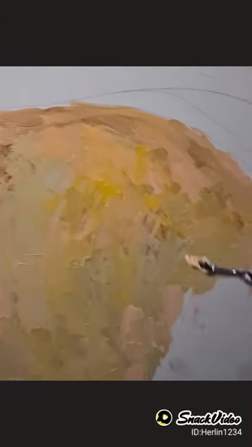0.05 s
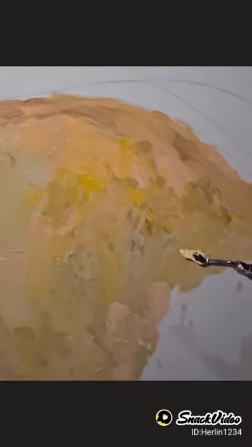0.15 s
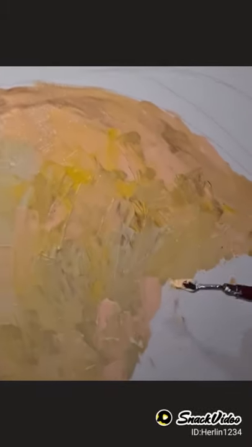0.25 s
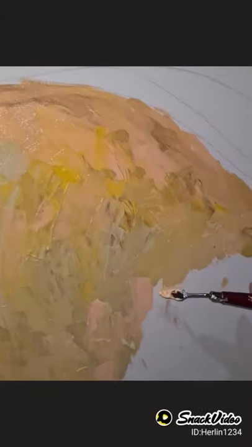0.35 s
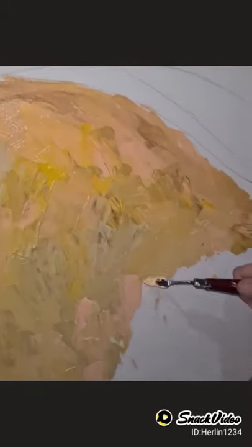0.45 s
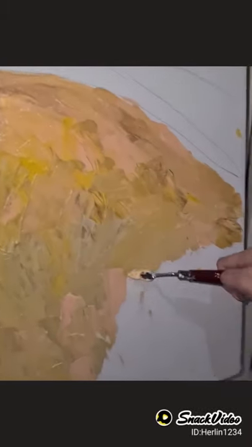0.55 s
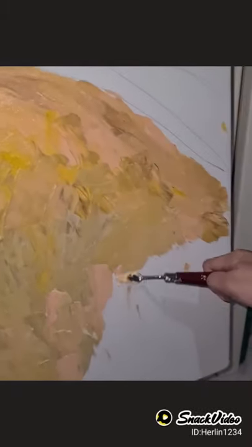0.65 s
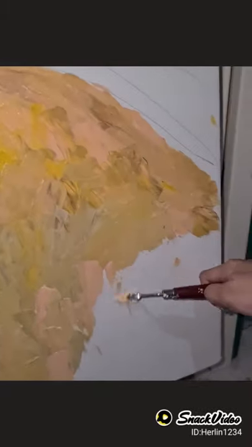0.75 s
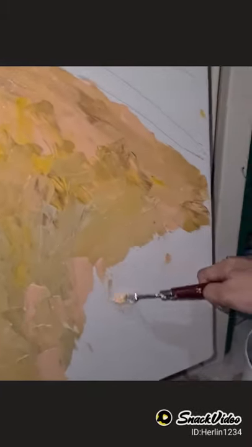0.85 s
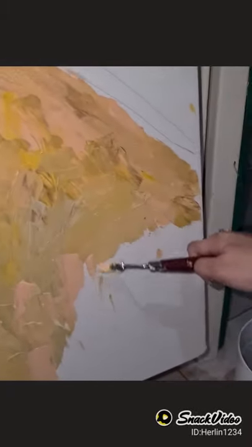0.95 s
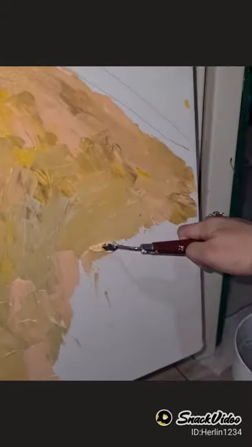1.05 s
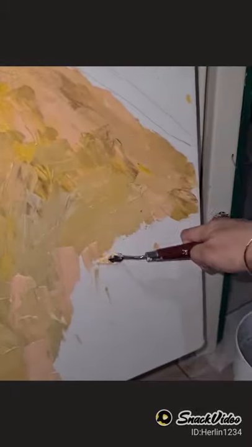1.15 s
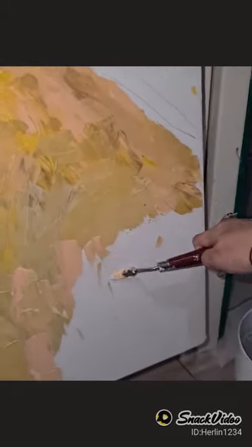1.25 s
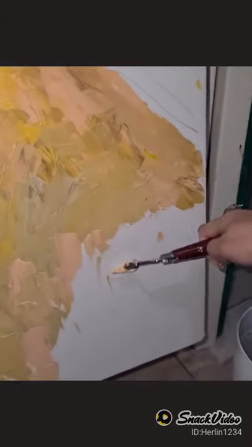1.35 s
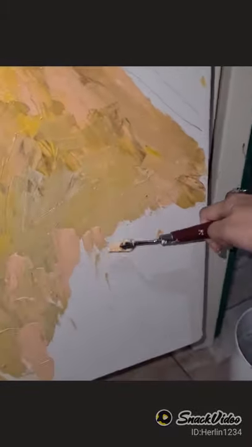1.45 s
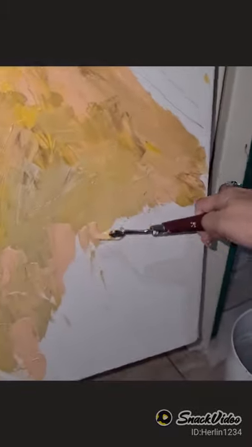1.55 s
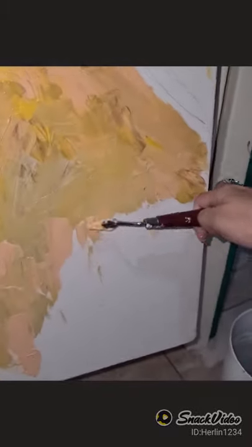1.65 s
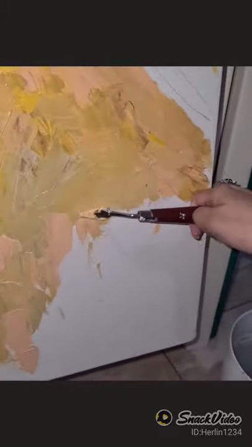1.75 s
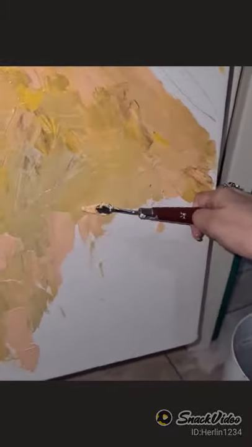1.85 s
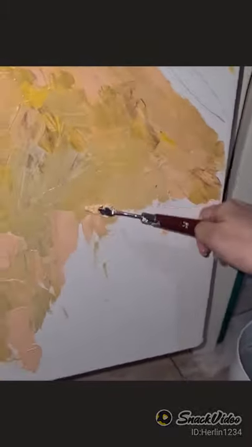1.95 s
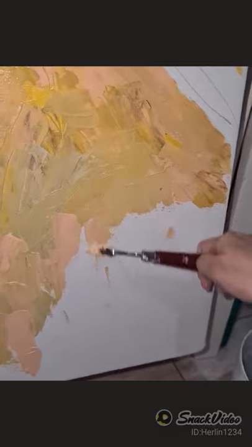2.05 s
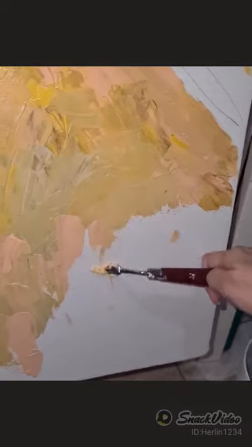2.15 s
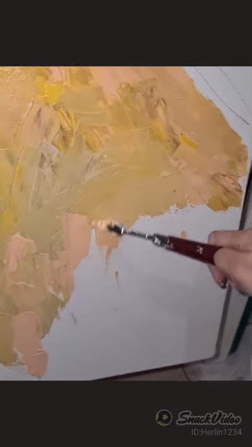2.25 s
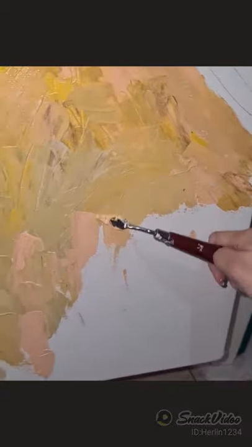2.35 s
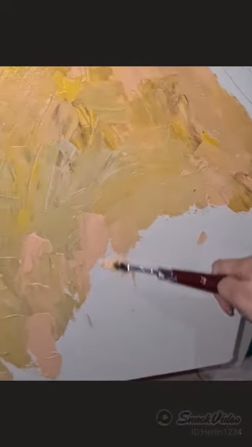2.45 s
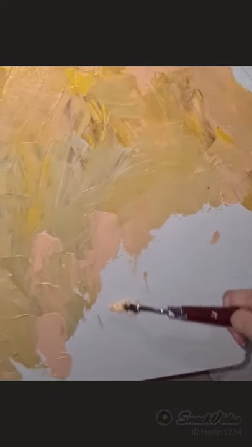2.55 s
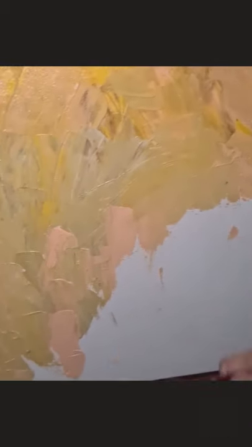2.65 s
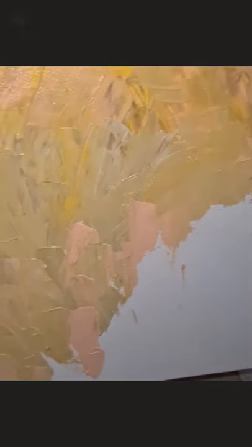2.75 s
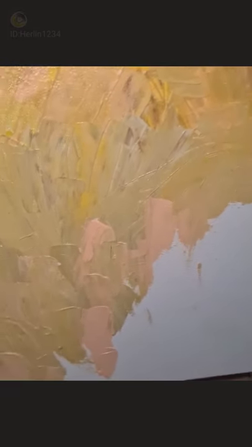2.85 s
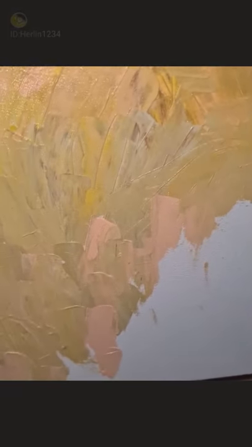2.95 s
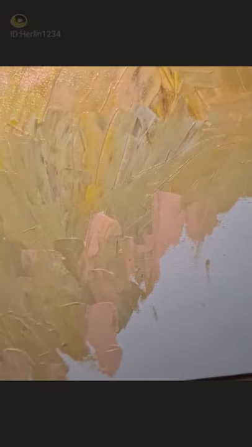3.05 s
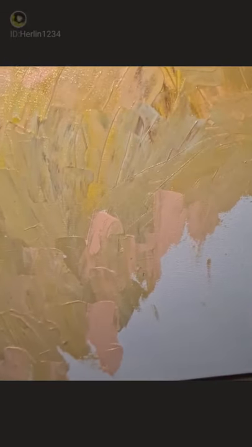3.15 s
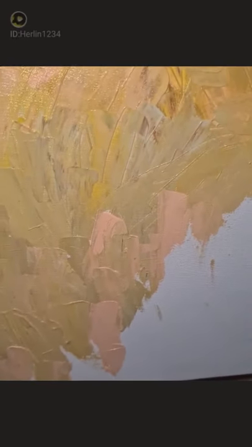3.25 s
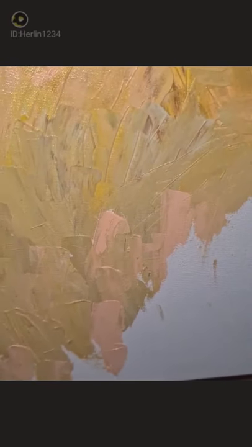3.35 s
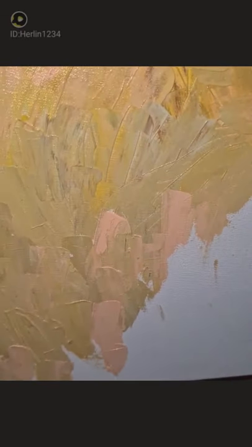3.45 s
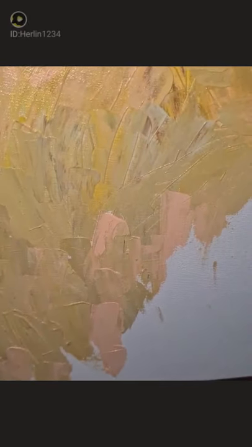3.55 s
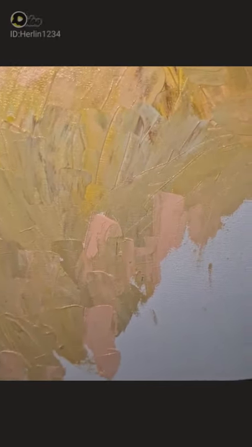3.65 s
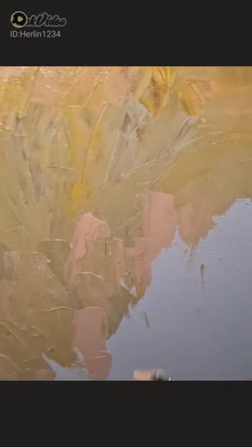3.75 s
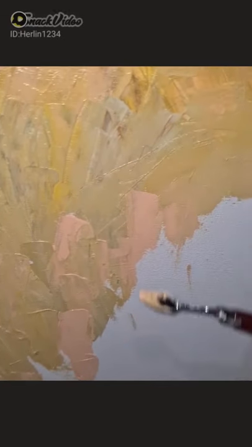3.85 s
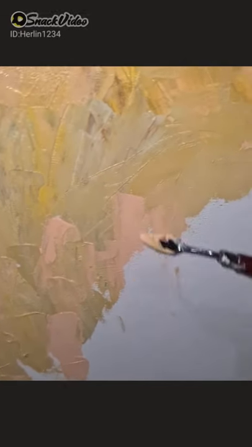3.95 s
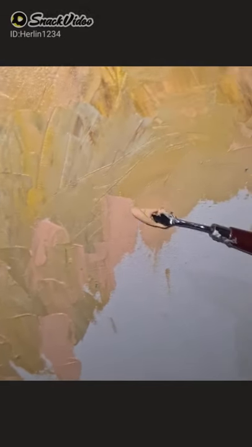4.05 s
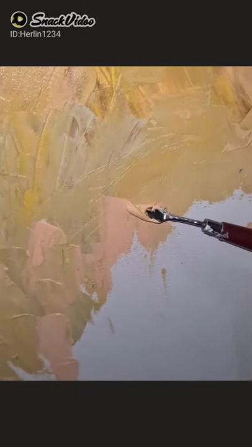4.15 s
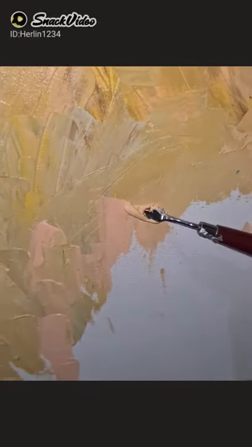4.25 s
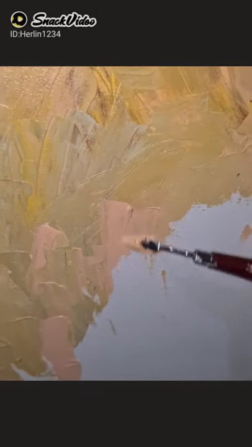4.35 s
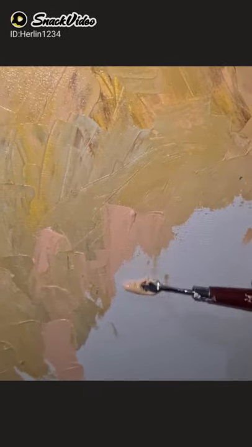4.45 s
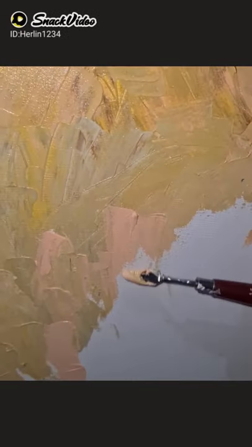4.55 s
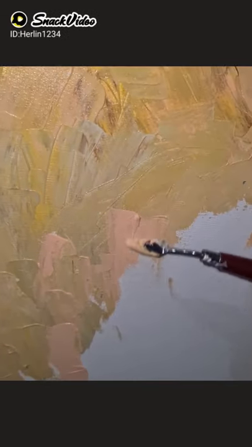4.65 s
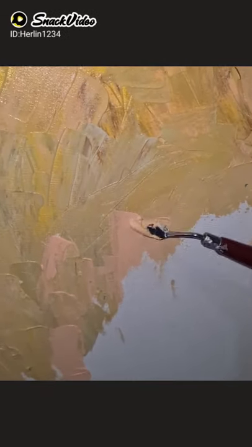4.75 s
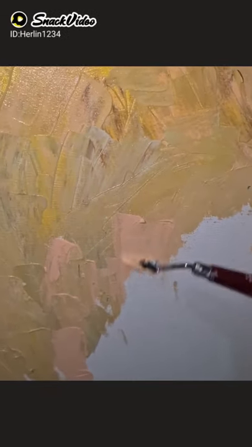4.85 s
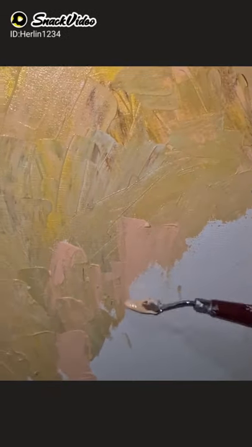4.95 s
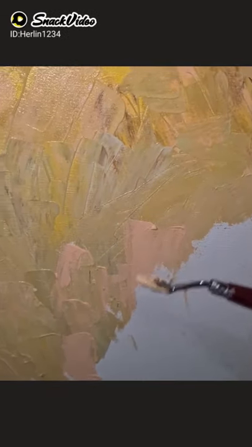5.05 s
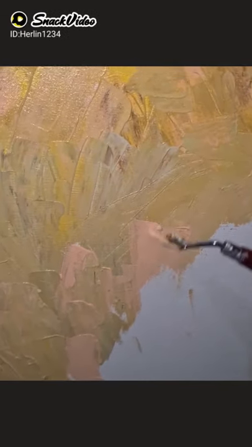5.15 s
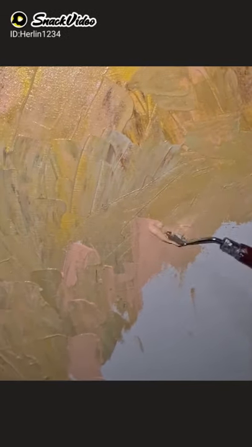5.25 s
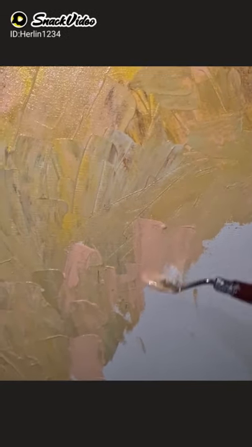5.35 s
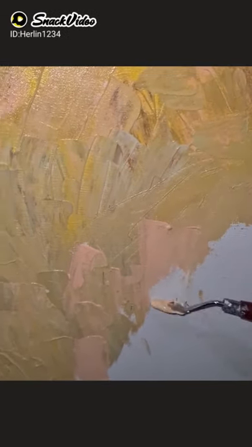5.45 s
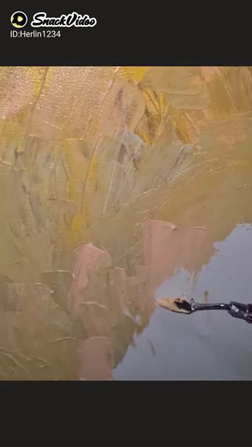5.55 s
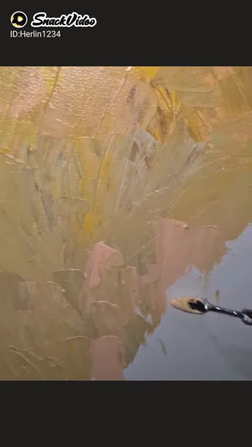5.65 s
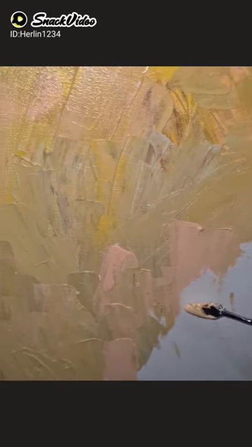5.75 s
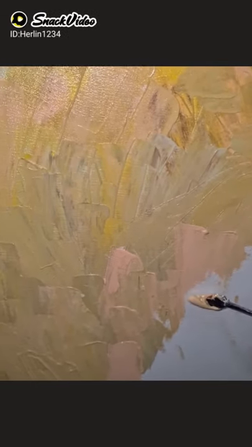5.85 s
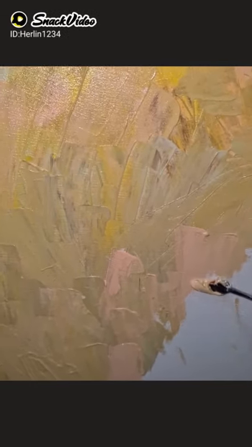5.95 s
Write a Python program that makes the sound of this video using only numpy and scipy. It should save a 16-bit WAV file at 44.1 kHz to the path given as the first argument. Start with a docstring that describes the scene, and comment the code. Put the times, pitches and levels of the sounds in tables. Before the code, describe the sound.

A palette knife rubs thick paint on stretched canvas in brief hollow, raspy strokes, sparse small groups over quiet room air and a low hum.

```python
"""Quiet room air and a wavering low hum, then dull dry ticks, a faint rustle and the first tap of a palette knife.
The knife spreads thick paint on a stretched canvas in short strokes, in a small room.
Random slips of the blade on the weave ring the canvas modes as a drumming; grainy noise and blade modes
make the steel rasp, with a finer hiss above. Taps thud in the canvas, click in the steel and thump the frame.
Air is banded noise, hum is sines; short echoes and feedback delays make the surroundings."""
import sys
import numpy as np
from scipy import signal
from scipy.io import wavfile
from scipy.ndimage import uniform_filter1d

SR = 44100
rng = np.random.default_rng(int(sys.argv[2]) if len(sys.argv) > 2 else 0)


def store_wav(level_fs):
    """Save 16-bit WAV to argv[1]."""
    pcm = np.round(np.clip(np.atleast_2d(level_fs), -1, 1) * 32767)
    wavfile.write(sys.argv[1], SR, pcm.T.astype(np.int16))


N = 264600
TIME = np.arange(N) / SR

# Spectral tables give noise density, so their level/dB is per Hz and only relative.
# Left-right columns are positive towards the left.
# room air: f/Hz, level/dB
AIR_SPECTRUM = [(25, -20), (45, 2.5), (65, 0), (95, -10.5), (125, 1), (200, -20.5), (400, -11), (620, -16),
                (850, -16.5), (1600, -20.5), (2600, -27), (4000, -38), (6500, -46), (15500, -48.5)]
# left-right likeness of the air: f/Hz, likeness (1 = same on both sides)
AIR_LIKENESS = [(60, 1), (250, 0.59), (1000, 0.067), (4000, 0.033), (12000, .1)]
# steady hum tones: f/Hz, rms level/dB
HUM_TONES = [(165, -64), (247.5, -76.5)]
# swells of the deep hum: middle t/s, half width t/s, rise level/dB
DEEP_SWELLS = [(2.42, 0.058, 16.5), (4.9, 0.88, 8.2)]
# faint dry ticks: t/s, relative level/dB
DRY_TICKS = [(0.081, -28), (0.212, -27), (0.2335, -30.5), (0.261, -29), (0.3055, -33), (0.321, -33),
             (0.327, -30), (0.3675, -30.5), (5.671, -35)]
# small dry clicks: t/s, relative level/dB
SMALL_CLICKS = [(3.461, -41.5), (3.533, -45), (3.593, -55), (3.649, -52.5)]
# tones the small clicks leave: f/Hz, level/dB, t60 t/s
CLICK_MODES = [(1200, -16.5, 0.19), (1252, 5, 0.029), (1980, -7.5, 0.026), (2740, -24, .018)]
# faint rustles: middle t/s, half width t/s, level/dB
RUSTLES = [(.345, 0.068, -63.5), (3.34, 0.067, -71)]
# colour of the rustles: f/Hz, level/dB
RUSTLE_SPECTRUM = [(2200, 4), (3200, 12), (5000, -2), (7000, -19), (11000, -12)]
# left-right likeness of rustle and scrape: f/Hz, likeness
SCRAPE_LIKENESS = [(800, 0.75), (2000, 0.49), (4000, 0.03), (9000, 0.02)]
# blade lands or snags: t/s, then relative level/dB of canvas thud, steel click, frame thump
TAPS = [(0.497, -36.5, -75, -60), (0.686, -40, -33.5, -80), (0.8113, -25, -15.5, -82),
        (0.8195, -31, -21.5, -82), (1.125, -59, -62, -49), (1.385, -40, -70, -51), (2.3235, -31, -35, -55),
        (2.389, -37, -38, -72), (2.4865, -31, -41, -71), (4.079, -28, -49, -42), (4.086, -40, -58, -40.5),
        (4.763, -40, -65, -56), (4.833, -27, -49, -80), (5.204, -27.5, -60, -58), (5.291, -31, -32, -70),
        (5.313, -26.5, -30, -78), (5.358, -16.5, -40, -80), (5.39, -14.5, -37, -80)]
# stretched canvas modes: f/Hz, width f/Hz, level/dB, left-right level/dB
CANVAS_MODES = [(259, 73, -16, 22), (364.8, 28.4, 5.5, -7), (409.7, 28.5, 0.5, -6), (500.6, 43, -0.5, -4.5),
                (530.7, 30, -4.5, -6.5), (623, 40, -10.5, 17.5), (739, 81, -2, 7.5), (812, 33, -4, 3.5),
                (1032, 28, -7.5, 2)]
# steel blade modes: f/Hz, level/dB, t60 t/s
BLADE_MODES = [(1453, -19, 0.025), (1800, -12, 0.024), (1983, -11.5, 0.04), (2575, -12.5, 0.028),
               (3330, -1, 0.02), (3605, -12.5, 0.045), (3770, -7.5, 0.093), (4125, -5.5, 0.016),
               (6120, -4, 0.0067), (8900, -11, .004)]
# wooden frame modes: f/Hz, level/dB, t60 t/s
FRAME_MODES = [(88, 1, 0.19), (139.5, -3.5, 0.098), (190, -8.5, 0.16)]
# pushes of the blade: start t/s, length t/s, drumming level/dB, its swell level/dB, rasp level/dB,
# its swell level/dB, hiss above rasp level/dB, bite t/s, lift t/s
# (relative levels at mid-stroke; swell runs from start to end)
STROKES = [ (0.680, 0.14, -31, 2, -42.5, 13, -6.5, 0.0017, 0.02),
           (1.125, 0.048, -48.5, 3, -58.5, -16, -9, .025, 0.016),
           (1.200, 0.064, -38, 7, -47, 6, -7, 0.026, 0.011),
           (1.272, 0.047, -46, -12, -50.5, -1, -5, .005, 0.03),
           (2.001, 0.12, -38.5, 0, -40, 2.5, -6.5, 0.025, 0.019),
           (2.318, 0.03, -48, -2, -56, -7, -9, .004, 0.027),
           (2.38, 0.035, -29, -1.5, -38.5, 9, -11.5, 0.015, 0.027),
           (2.44, 0.057, -32.5, 0.5, -37.5, 9, -3.5, 0.023, 0.019),
           (4.296, 0.14, -38.5, 8.5, -46, 26, -7, 0.015, .016),
           (4.828, 0.130, -34, 3.5, -36, 2, -7.5, 0.027, 0.012),
           (5.313, 0.1, -36, -2, -33.5, -5, -6, .022, 0.018), ]
# spots on the canvas, each favouring two tones, with the blade's angle setting ring and sheen:
# from t/s, low f/Hz, low level/dB, high f/Hz, high level/dB, blade ring level/dB, sheen level/dB
SPOTS = [(0.6, 427.4, -4, 751, -8.5, -15, -9), (1.05, 452, -5, 760, -31, -12.5, -7.5),
         (1.9, 478, -8.5, 789.5, -2.5, -11.5, -8), (2.3, 411.5, -5.5, 782, -6, -7.5, -7),
         (4.2, 498, -9.5, 759, -20, -19, -9.5), (4.75, 506, -17, 639, -14, -22, -10.5),
         (5.25, 344, -7, 822, -2, 0, -17)]
# steel on weave: f/Hz, level/dB
RASP_SPECTRUM = [(800, -3.5), (1050, -7.5), (1400, 3.5), (1800, 0.5), (2300, -6.5), (2800, -5), (3800, -8),
                 (4800, -10.5), (6500, -30.5)]
# fine hiss of the edge: f/Hz, level/dB
HISS_SPECTRUM = [(3500, -12), (5000, -9), (6000, 12), (7400, -15), (9300, -2.5), (12000, 8), (15500, -12.5)]
# echoes from nearby surfaces: left delay t/s, right delay t/s, level/dB
ECHOES = [(.0023, .0031, -12), (.0052, .0044, -10.5), (.0083, .0097, -6.5)]

AIR_DB = -58.5
DEEP_HZ, DEEP_DB = 59.6, -63.5  # deep hum at rest, rms
CLICK_LAG_S = 0.00035  # the left side hears the small clicks later
LAND_S = 0.0067  # the canvas takes up the blade's pressure
EDGE_FLAT_DB = -11.5  # rasp while the blade still rides on paint, before its edge bites
UNEVEN_DB, UNEVEN_HZ = 0.5, 24.2  # the drag varies with the thickness of the paint
ROOM_T60_S, WALL_CUT_HZ, ROOM_DB = 0.24, 20600, -18
CUTOFF_HZ = 15650


def from_db(db):
    """Decibels to gain."""
    return 10 ** (np.asarray(db) / 20)


def rms_one(x):
    """Scale to unit power."""
    return x / np.sqrt(np.mean(x ** 2) + 1e-20)


def at_hz(points, hz):
    """Read a table on a log-frequency axis."""
    points = np.array(points)
    return np.interp(np.log(hz), np.log(points[:, 0]), points[:, 1])


def pan(db):
    """Left and right gains for a level difference."""
    return from_db(np.array([[db], [-db]]) / 2)


def drift(rate_hz):
    """Smooth random wandering with spread 1, made at a twentieth of the sample rate."""
    r = np.exp(-40 * np.pi * rate_hz / SR)
    white = rng.standard_normal(N // 20 + 4002)
    slow = signal.lfilter([1], [1, -2 * r, r * r], white)[4000:]  # skip the filter's run-in
    return np.interp(np.arange(N) / 20, np.arange(len(slow)), rms_one(slow))


def cut(x, hz, kind, order=2):
    """Butterworth filter."""
    return signal.sosfilt(signal.butter(order, hz, kind, fs=SR, output="sos"), x + 1e-18)


def ring(clicks, hz, t60):
    """A unit click sets a decaying sine of height 1 ringing."""
    r = from_db(-60 / (t60 * SR))
    w = 2 * np.pi * hz / SR
    return signal.lfilter([0, np.sin(w)], [1, -2 * r * np.cos(w), r * r], clicks + 1e-18)


def width_to_t60(width_hz):
    """The wider a resonance, the sooner it dies away."""
    return np.log(1000) / (np.pi * width_hz)


def struck(clicks, modes):
    """All modes of an object answer the same blows."""
    return sum(from_db(db) * ring(clicks, hz, t60) for hz, db, t60 in modes)


def blows(rows, axis=1):
    """One impulse an event, as strong as the given column says."""
    out, rows = np.zeros(N), np.array(rows)
    out[(rows[:, 0] * SR).astype(int)] = from_db(rows[:, axis])
    return out


def chatter(hits, fade_s):
    """A contact buzzes for an instant after each hit: fading noise of random sign."""
    fading = signal.lfilter([1], [1, -np.exp(-1 / (fade_s * SR))], hits + 1e-18)
    return fading * rng.choice([-1, 1], (2, N))


def swell(middle, half_width):
    """A smooth rise and fall of height 1."""
    return np.exp(-np.square((TIME - middle) / half_width))


def banded_noise(spectrum, likeness, patchy_db):
    """Half-octave bands of stereo noise, each with its own level, flicker and likeness; rms 1."""
    out = 0
    edges = 22 * 2 ** np.arange(0, 9.6, .5)
    white = rng.standard_normal((2, 2, N))
    for k, (low, high) in enumerate(zip(edges, edges[1:])):
        if high < spectrum[0][0] or low > spectrum[-1][0]:
            continue
        mid, side = cut(white[k % 2], [low, high], "band")
        hz = np.sqrt(low * high)
        alike = np.clip(at_hz(likeness, hz), -1, 1)
        gain = from_db(at_hz(spectrum, hz) + patchy_db * drift(25))
        out = out + gain * (np.sqrt(1 + alike) * mid + np.sqrt(1 - alike) * side * [[1], [-1]])
    return rms_one(out)


def background():
    """Room air as banded noise, a wavering deep hum and steady sines above it."""
    air = from_db(AIR_DB) * banded_noise(AIR_SPECTRUM, AIR_LIKENESS, patchy_db=2.06)
    rises_db = sum(db * swell(s, width) for s, width, db in DEEP_SWELLS)
    deep_db = DEEP_DB + rises_db + 2.3 * drift(9)
    deep = from_db(deep_db) * np.sin(2 * np.pi * DEEP_HZ * TIME + .5 * drift(7.3))
    tones = sum(from_db(db) * np.sin(2 * np.pi * hz * TIME) for hz, db in HUM_TONES)
    return (air + np.sqrt(2) * (deep + tones)) * pan(-1.1)


def ticking():
    """Dull ticks on the right are filtered impulses; small clicks are a buzz and a faint ring."""
    dull = cut(blows(DRY_TICKS), 1525, "low", order=8)
    ticks = from_db(12.5) * cut(dull, 290, "high", order=1)
    clicks = blows(SMALL_CLICKS)
    rattle = cut(chatter(clicks, fade_s=0.0027)[0], [1100, 3200], "band", order=3)
    tones = cut(struck(clicks, CLICK_MODES), [850, 3500], "band")
    clink = from_db(-9.5) * rattle + tones
    late = np.interp(TIME - CLICK_LAG_S, TIME, clink)
    return ticks * pan(-10) + from_db(3) * np.array([late, clink]) * pan(3.4)


def rustling():
    """Faint, soft noise that rises and falls before and between the strokes."""
    level = sum(from_db(db) * swell(s, width) for s, width, db in RUSTLES)
    return level * banded_noise(RUSTLE_SPECTRUM, SCRAPE_LIKENESS, patchy_db=2.0)


def canvas(force):
    """Membrane modes, each radiating in its own direction; the open back cancels the bass."""
    out = 0
    for hz, width, db, pan_db in CANVAS_MODES:
        mode = ring(force, hz, width_to_t60(width))
        out = out + from_db(db) * width / CANVAS_MODES[0][1] * pan(pan_db) * mode
    return cut(out, 244, "high", order=4)


def reflected(x):
    """Short echoes carve a different fine comb into each side."""
    out = x.copy()
    for *delays, db in ECHOES:
        for side, s in enumerate(delays):
            out[side] += from_db(db) * np.roll(x[side], int(s * SR))
    return out


def tapping():
    """A touch of the knife thuds in the canvas, rings in the steel and thumps the frame; hard snags crack."""
    pushes, hits, knocks = blows(TAPS, axis=1), blows(TAPS, axis=2), blows(TAPS, axis=3)
    hardness = (hits / hits.max()) ** 0.48
    snags = hits * hardness
    snap = 1.4 * snags + .7 * chatter(snags, fade_s=.003)
    crack = cut(cut(snap, 5700, "low"), 822, "high", order=1)
    # wet paint cushions the contact, so the highest modes stay quiet
    thud = from_db(-10.5) * canvas(cut(pushes, 520, "low"))
    steel = from_db(-12.5) * struck(cut(hits, 4100, "low", order=3), BLADE_MODES)
    return thud + reflected(crack + steel) + struck(knocks, FRAME_MODES)


def stroke_gains():
    """Drumming, rasp and hiss: the blade lands, its edge bites, the level ramps evenly in dB, then it lifts."""
    drum, rasp, hiss = np.zeros((3, N))
    for start, length, drum_db, drum_swell_db, rasp_db, rasp_swell_db, hiss_db, bite_s, lift_s in STROKES:
        age = TIME - start
        landing = .5 * (1 + np.tanh(age / LAND_S))
        lifting = np.exp(-np.maximum(age - length, 0) / lift_s)
        contact = landing * lifting
        travel = np.clip(age / length, 0, 1) - .5
        riding = 1 - np.clip(age / bite_s, 0, 1)
        edge = contact * from_db(rasp_db + rasp_swell_db * travel + EDGE_FLAT_DB * riding)
        drum += contact * from_db(drum_db + drum_swell_db * travel)
        rasp += edge
        hiss += edge * from_db(hiss_db)
    return np.array([drum, rasp, hiss]) * from_db(UNEVEN_DB * drift(UNEVEN_HZ))


def slips(per_s, spread_db):
    """The edge catches on threads and lets go: random clicks of uneven size."""
    sizes = from_db(spread_db * np.minimum(rng.exponential(1, N), 4))
    signs = rng.choice([-1, 1], N)
    return sizes * signs * (rng.random(N) < per_s / SR)


def steady(x):
    """The hand keeps an even drag: unit power over two hundredths of a second."""
    power = uniform_filter1d(np.mean(np.atleast_2d(x) ** 2, axis=0), size=900)
    return x / np.sqrt(np.abs(power) + 1e-12)


def at_spot(axis):
    """A column of the spot table, held until the next spot."""
    spots = np.array(SPOTS)
    current = np.maximum(np.searchsorted(spots[:, 0], TIME) - 1, 0)
    return spots[current, axis]


def spot_tones(catches, width_hz):
    """The two canvas tones that the spot under the blade favours, rung by its catches."""
    tones = np.zeros((2, N))
    directions = [(hz, pan_db) for hz, _, _, pan_db in CANVAS_MODES]
    for s, low_hz, low_db, high_hz, high_db, *_ in SPOTS:
        start, pair = int(s * SR), 0
        for hz, db in (low_hz, low_db), (high_hz, high_db):
            tone = steady(ring(catches, hz, width_to_t60(width_hz)))
            pair = pair + from_db(db) * pan(at_hz(directions, hz)) * tone
        tones[:, start:] = pair[:, start:]
    return tones


def drumming():
    """Slips shake the whole membrane, with extra tones from the spot being rubbed."""
    membrane = steady(canvas(slips(per_s=1500, spread_db=4.0)))
    tones = spot_tones(slips(per_s=1500, spread_db=2.5), width_hz=12.0)
    return cut(steady(membrane + from_db(0.5) * tones), 249, "high", order=4)


def scraping():
    """The canvas drums, the blade rings and the weave chops the rasp into grains."""
    drum, rasp, hiss = stroke_gains()
    blade_ring, sheen = from_db(at_spot(axis=5)), from_db(at_spot(axis=6))
    grain = rms_one(from_db(1.93 * drift(330)))

    rough = banded_noise(RASP_SPECTRUM, SCRAPE_LIKENESS, patchy_db=2.0) * grain
    friction = rms_one(reflected(rough))
    blade = struck(slips(per_s=1100, spread_db=-1.0), BLADE_MODES)
    ringing = rms_one(reflected(blade * pan(-0.54)))
    steel = (friction + blade_ring * ringing) / np.sqrt(1 + blade_ring ** 2)

    fine = banded_noise(HISS_SPECTRUM, SCRAPE_LIKENESS, patchy_db=2.0) * grain
    fine = rms_one(reflected(fine))
    body = cut(fine, 9600, "low", order=3)
    top = from_db(1.0) * sheen * cut(fine, 9200, "high", order=3) * pan(-1.6)

    drum_part = from_db(-0.88) * drum * drumming()
    rasp_part = from_db(-1.6) * rasp * steel * pan(-0.41)
    hiss_part = from_db(1.24) * hiss * (body + top) * pan(-0.57)
    return drum_part + rasp_part + hiss_part


def room(x):
    """Eight feedback delays a side, a little duller on every round."""
    out = np.zeros((2, N))
    dull = np.exp(-2 * np.pi * WALL_CUT_HZ / SR)
    lags = (rng.uniform(.007, .036, 16) * SR).astype(int)
    for k, lag in enumerate(lags):
        loop, state = x[k % 2].copy(), [0.]
        gain = from_db(-60 * lag / SR / ROOM_T60_S)
        for i in range(lag, N, lag):
            back, state = signal.lfilter([gain * (1 - dull)], [1, -dull], loop[i - lag:i], zi=state)
            loop[i:i + lag] += back[:N - i]
        # keep only the returns, with alternating sign
        out[k % 2] += (loop - x[k % 2]) * (-1) ** (k // 2)
    return out


def scene():
    """Knife and canvas close by, the room behind them."""
    near = ticking() + rustling() + tapping() + scraping()
    return background() + near + from_db(ROOM_DB) * room(near)


def record(dry):
    """A steep elliptic low-pass cuts the top."""
    return signal.sosfilt(signal.ellip(10, .2, 70, CUTOFF_HZ, fs=SR, output="sos"), dry)


dry = scene()
out = record(dry)
store_wav(out)
```